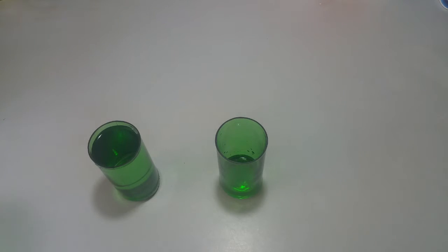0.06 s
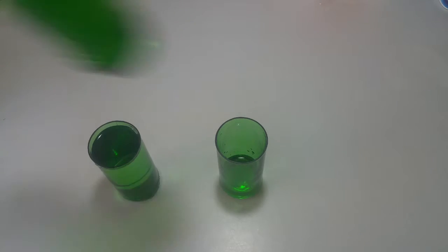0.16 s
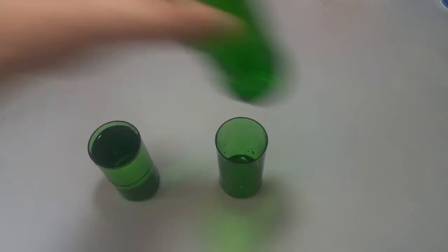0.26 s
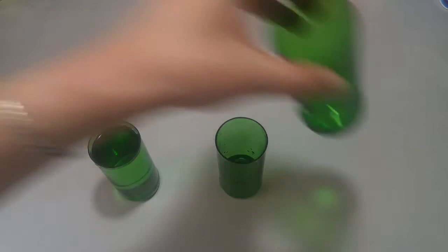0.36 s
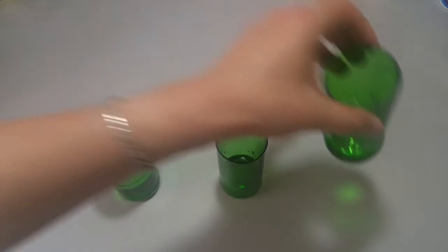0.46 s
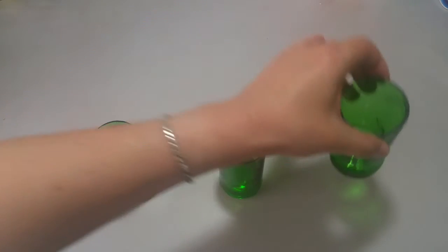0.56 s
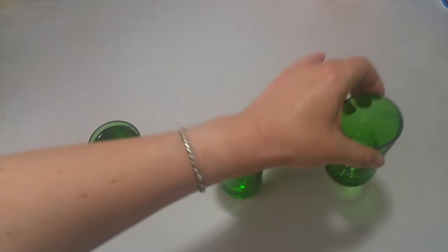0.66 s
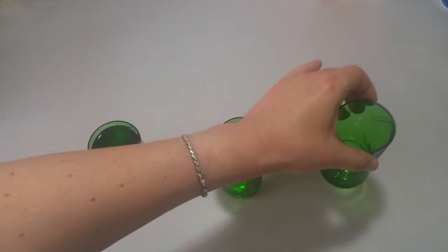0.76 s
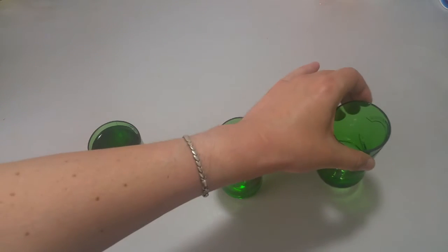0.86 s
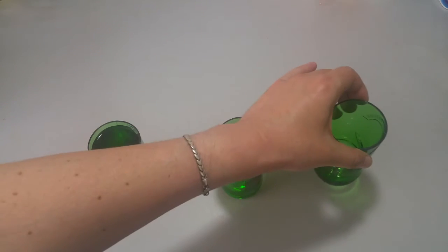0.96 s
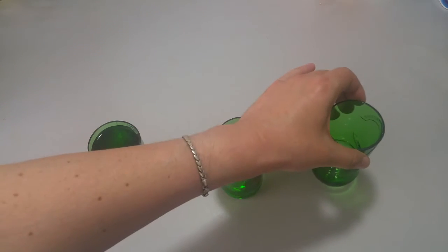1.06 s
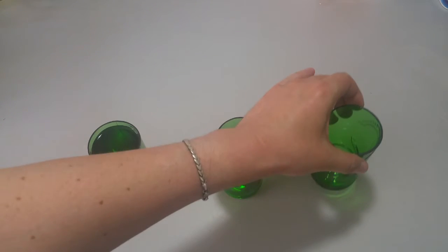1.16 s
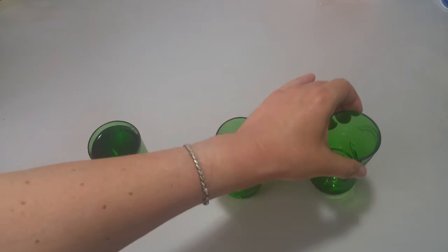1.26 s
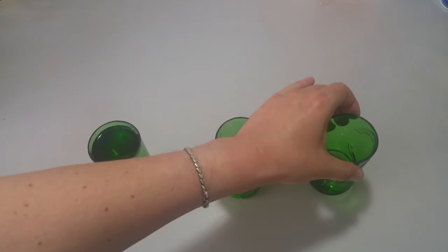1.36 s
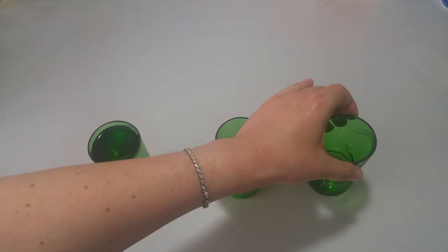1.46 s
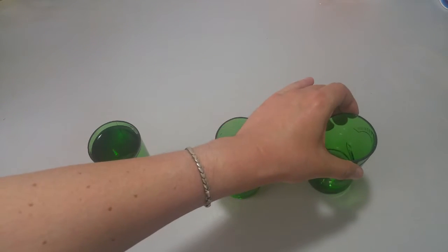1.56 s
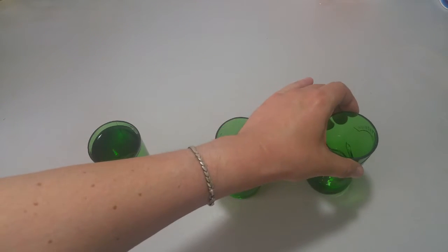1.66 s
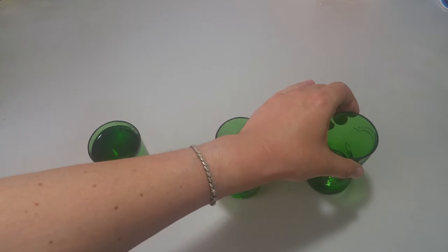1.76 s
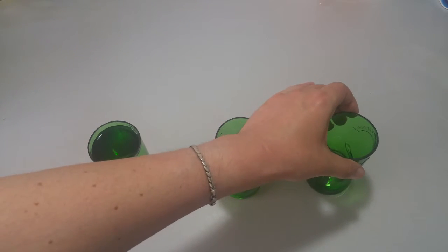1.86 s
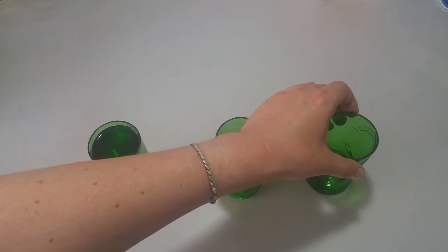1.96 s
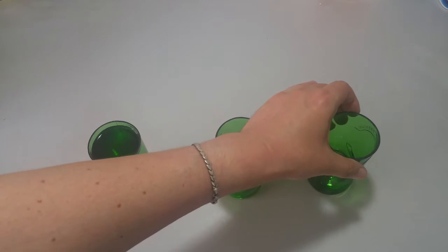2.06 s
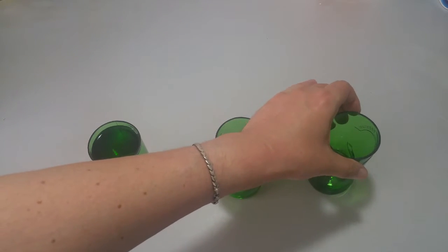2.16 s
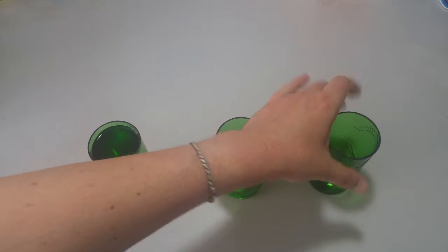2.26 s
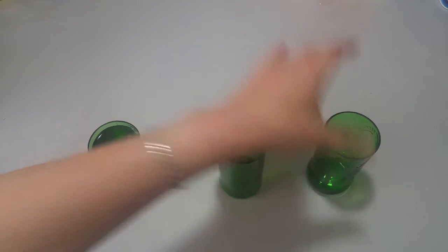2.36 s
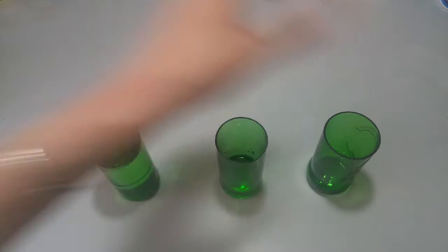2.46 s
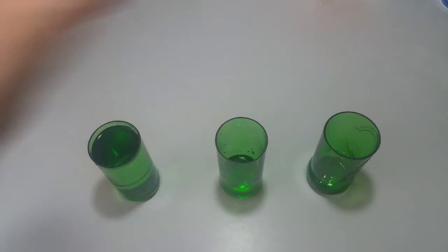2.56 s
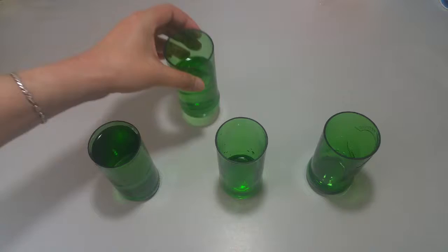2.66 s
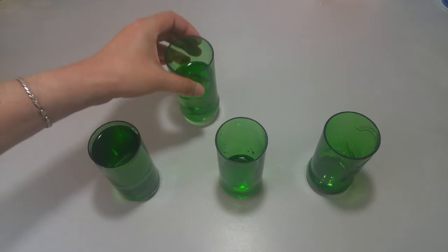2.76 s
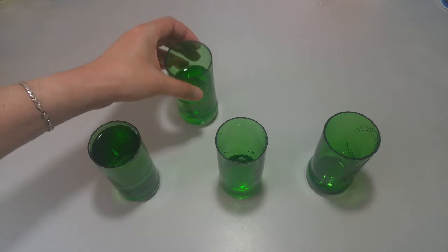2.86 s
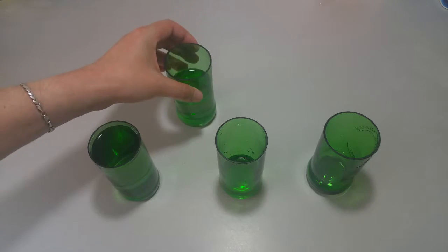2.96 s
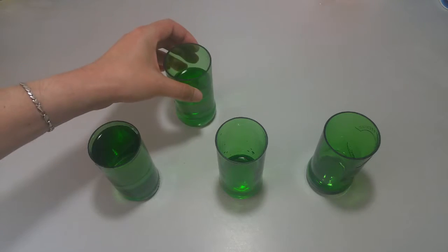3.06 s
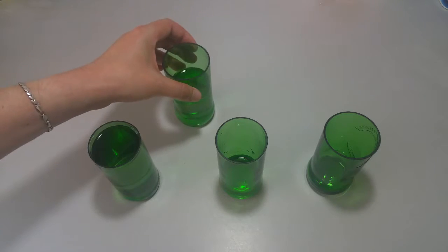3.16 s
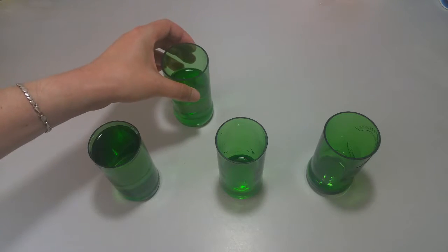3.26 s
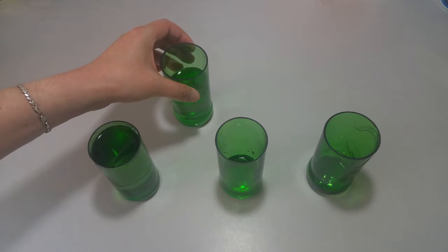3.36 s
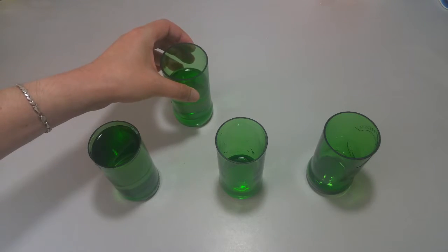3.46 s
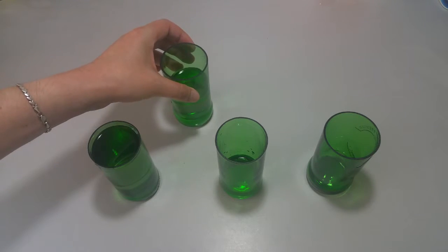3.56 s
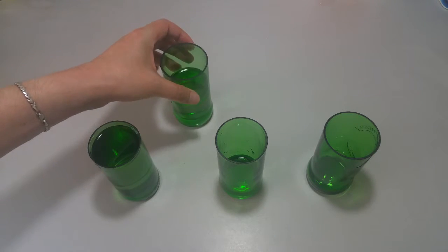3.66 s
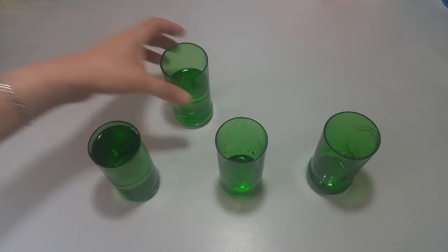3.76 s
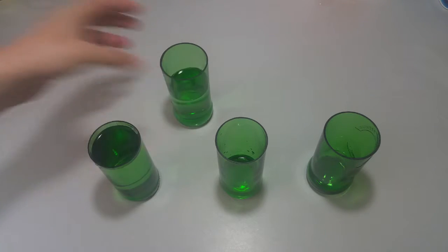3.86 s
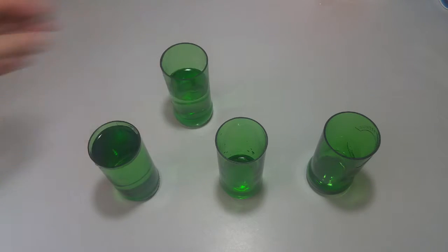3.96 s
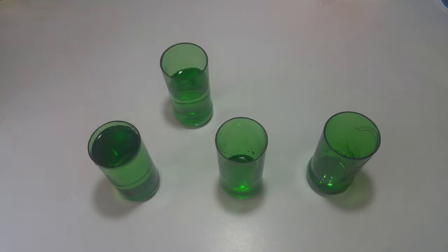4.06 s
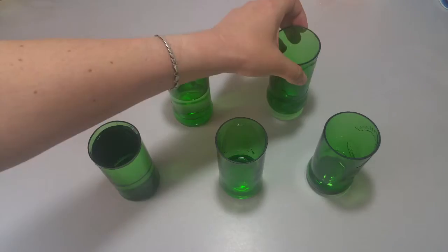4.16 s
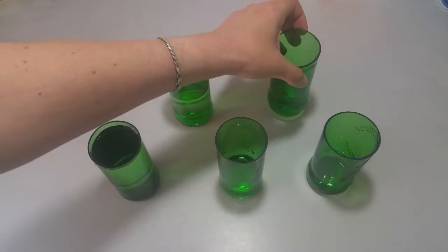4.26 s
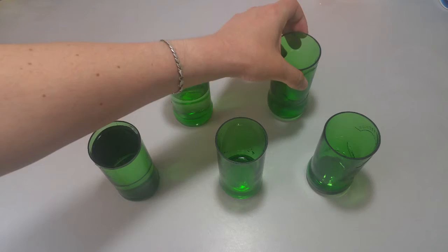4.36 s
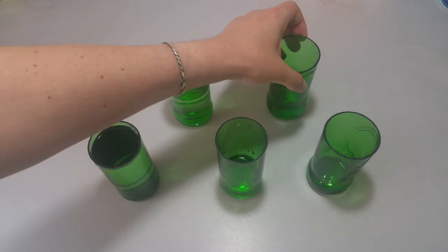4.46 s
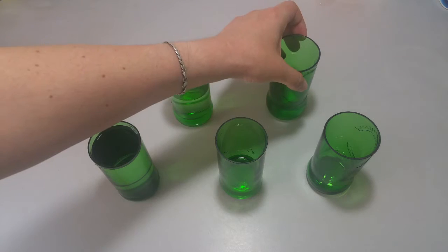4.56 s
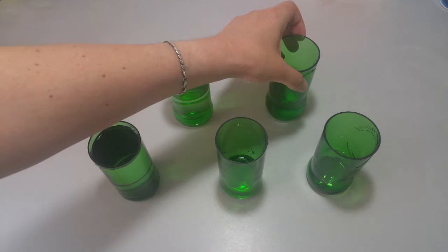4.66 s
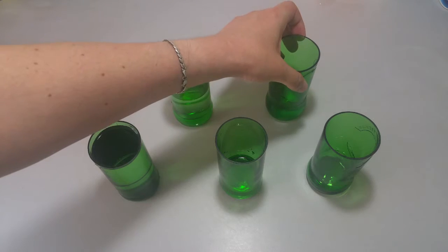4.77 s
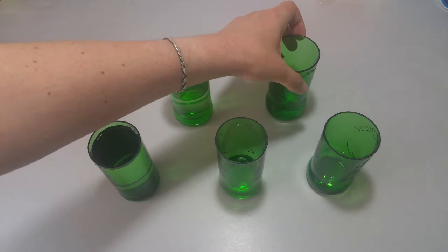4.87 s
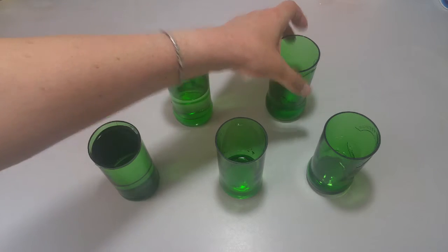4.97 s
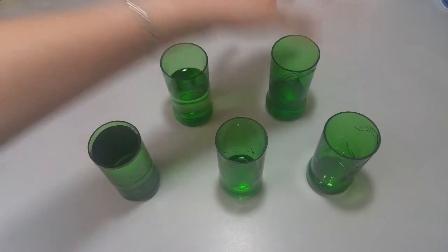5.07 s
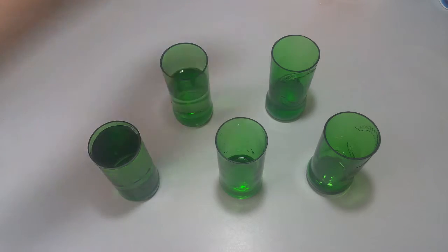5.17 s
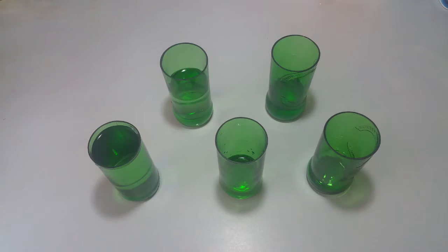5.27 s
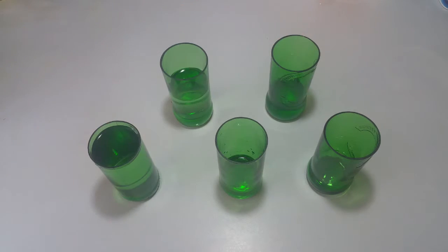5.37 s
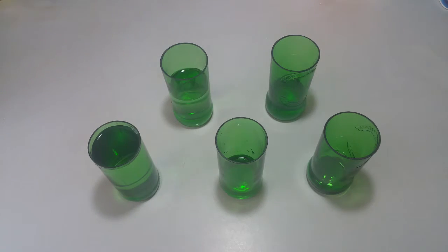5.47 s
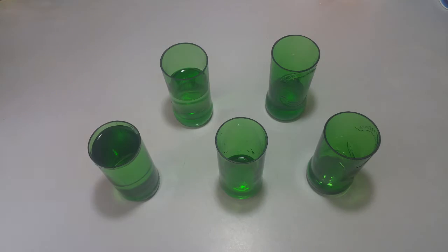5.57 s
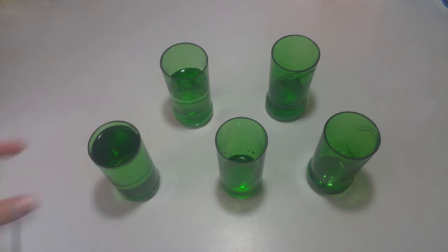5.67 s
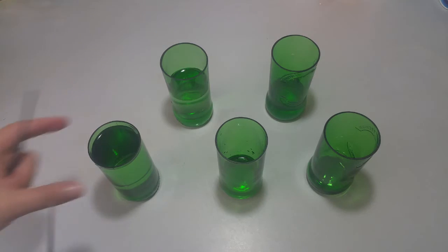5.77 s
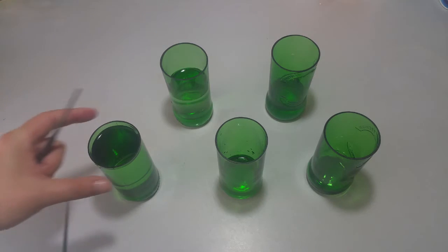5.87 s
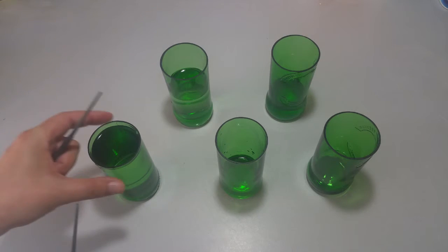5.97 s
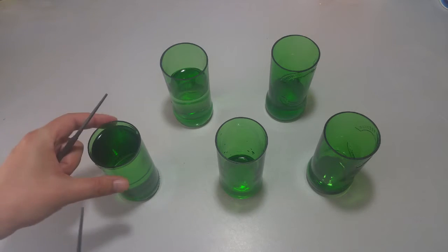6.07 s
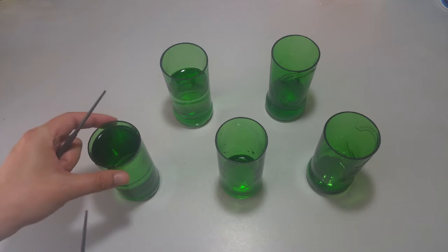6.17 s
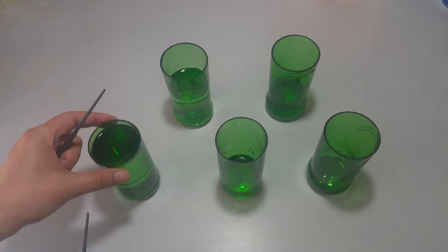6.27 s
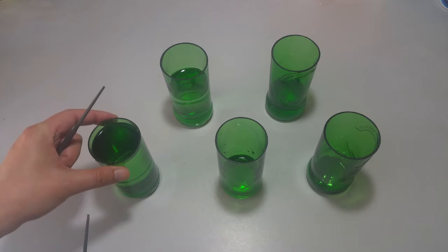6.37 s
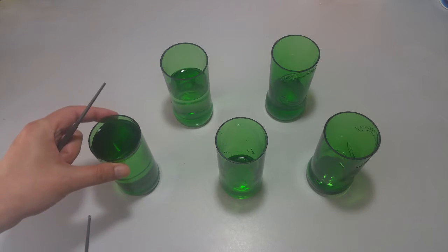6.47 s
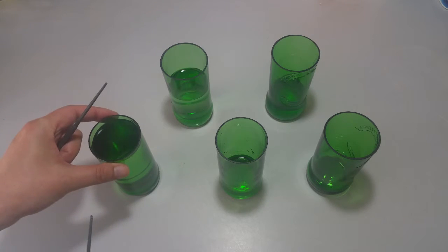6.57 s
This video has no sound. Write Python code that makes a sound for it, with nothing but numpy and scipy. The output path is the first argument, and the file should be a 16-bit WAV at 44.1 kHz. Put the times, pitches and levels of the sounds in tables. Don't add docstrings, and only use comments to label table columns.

```python
import sys
import numpy as np
from scipy import signal
from scipy.fft import rfft, irfft, next_fast_len
from scipy.io import wavfile
from scipy.ndimage import uniform_filter1d, map_coordinates

SR = 44100
rng = np.random.default_rng(int(sys.argv[2]) if len(sys.argv) > 2 else 0)


def voltage_ratio(decibels):
    exponent = np.asarray(decibels, float) / 20
    return 10 ** exponent


def materialize(psi):
    bounded = np.clip(np.atleast_2d(psi).T, -1, 1)
    quanta = np.round(bounded * 32767).astype(np.int16)
    wavfile.write(sys.argv[1], SR, quanta)


N = 292383

# time in seconds, peak in dB, table ring in dB, room in dB, clink in dB.
KNOCKS = [
    (1.5337, -18.5, -1, 10.5, -17.5),
    (1.7898, -23, -6, 10, -15),
    (2.122, -52.5, 9, 19.5, -8.5),
    (3.0069, -7.5, -3.5, 10, -17.5),
    (4.554, -5.5, -8, 8.5, -17),
    (6.27, -44, 1.5, 13.5, -40),
]
# delay in seconds, second contact in dB, first walls in dB,
# tail treble in dB, glass band of the tail in dB.
ROCKS = [(0.0028, -8, 0, -0.5, 3), (0.0036, -6, -2.5, 1, 1), (0.016, 7, -3, -6, -2),
         (0.001757, 2, -2.5, -4, 8), (0.0011, -3, -9, -0.5, 1.5), (0.0058, -10.5, 4, 0, 0)]
# frequency in Hz, level in dB per Hz.
THUDS = [
    [(24, -48.5), (128, -6.5), (329, -6.5), (800, -5), (1230, -22.5), (1420, -16), (2000, -24.5),
     (15000, -70)],
    [(24, -58), (160, -8), (244, -11), (514, -1), (1060, -6), (1820, -21.5), (4130, -45.5), (15000, -71.5)],
    [(120, -52), (200, -27), (290, -1), (385, -13), (519, -1), (1010, -14), (6000, -42), (13200, -120)],
    [(24, -55.5), (108, -5.5), (221, -8), (277, -1), (500, -6.5), (659, -1.5), (1960, -22.5), (15000, -71)],
    [(24, -55), (128, -7), (239, -14.5), (284, -9.5), (410, -9), (728, -2.5), (3000, -33), (15000, -70.5)],
    [(29, -46), (103, -16.5), (255, -10), (318, -2.5), (610, -21.5), (1020, -25.5), (3000, -54),
     (6600, -120)],
]
SHEEN_DB = [2.5, 2.5, 0.5, 8, 16, 0.5]
# frequency in Hz, level in dB, t60 in seconds.
FIRST_SPOTS = [
    [(127.8, -11, 0.65), (226, -10.5, 0.61), (261, -10, 0.54), (404, -26, 0.16), (495, -39, 0.81),
     (669, -13, 0.71), (759, -5.5, 0.33), (920, -4, 0.17), (976, -11.5, 0.47), (1067, -17.5, 0.42),
     (1425, -20, 0.1), (329.6, -11, 0.43)],
    [(320.1, -6, 0.35), (432, -5, 0.44), (496, 9.5, 0.092), (560, -22, 0.16), (752, -6.5, 0.47),
     (958, 0.5, 0.11), (1050, -5, 0.25), (1440, 9, 0.035), (1485, -16, 0.38), (1670, -15, 0.2),
     (1120, -6, 0.37), (725, -9.5, .4)],
    [(494, -2, 0.45), (756, -5, 0.46), (840, -23, 5.0), (1193, -21.5, 0.98)],
]
# frequency in Hz, level in dB, t60 in seconds.
LATER_SPOTS = [[(117.7, -12, 0.43), (187.2, -12.0, 0.45), (264.6, -12.5, 0.62), (423.7, -5.5, 0.45),
               (480, 2, 0.2), (669.5, -1.5, 0.38), (838.4, -7.0, 0.29), (890, -13, 0.49),
               (991, -10.5, 0.26), (1311, -15.0, 0.14)] + [(286.5, -4, .45), (2156, -25, 0.28),
               (79, -18, .4), (564, -8.5, .2)], [(131.3, -14.5, 0.61), (284.7, -3, 0.45), (340, -8.5, 0.54),
               (493.6, -11, .3), (443, -12, 0.5), (575, -15, 1.0), (669, -2.5, 0.28), (732, -7, 0.26),
               (737, -13.5, 0.2), (836, -13, 0.44), (877, -10, 0.27), (1333, -17, 0.3), (1690, -23, 0.44),
               (1863, -26, 0.54)], [(103, 0, 0.76), (178, -7, 0.79), (313.4, -2, 0.42), (514, -13.5, .7),
               (724, 0, 0.14)]]
# frequency in Hz, width in Hz, level in dB.
BASES = [
    [(2300, 124, 8.5), (2670, 77, -2), (3060, 155, -0.5), (3670, 120, -14), (4560, 280, -8),
     (6700, 98, -18)],
    [(2040, 30, -6), (2625, 64, -6), (3090, 250, 1.5), (3620, 150, -9), (4860, 110, -30)],
    [(1690, 28, -5), (2260, 36, -2), (2640, 47, -4), (3310, 45, -17)],
    [(1580, 86, 1), (2180, 25, -3.5), (3220, 180, -2.5), (3914, 210, -6.5), (4760, 260, -12),
     (6220, 120, -19.5), (7000, 320, -23)],
    [(2215, 240, 3.5), (2350, 69, -2), (2853, 470, 5), (3600, 230, -11), (4510, 290, -9.5),
     (6000, 206, -36.5), (6900, 252.4, -15.5), (7800, 360, -17.5)],
    [(1512, 19, 0), (2150, 52, -2)],
]
# frequency in Hz, width in Hz, depth in dB.
DIPS = [
    [(588, 57, 8), (1230, 70, 4.5), (1880, 120, 8.5)],
    [(250, 21, 9.5), (615, 45, 8.5), (833, 58, 8.5), (1250, 51, 10), (1790, 90, 11.5)],
    [(630, 45, 3), (1400, 100, 4)],
    [(351, 24.93, 5), (1204.5, 74, 4.5), (1930, 80, 7), (3450, 90, 5)],
    [(230, 8.5, 6), (622, 36, 8), (1000, 19, 3.5), (1536, 59, 9), (2000, 70, 8), (2300, 44, 6)],
    [(620, 60, 11), (1000, 80, 4)],
]
# frequency in Hz, left-right difference in dB.
TABLE_LEAN = [(250, -0.5), (600, -2), (1400, -1), (5000, -4), (12000, -2.5)]

# start, fastest and stop in seconds, level in dB, brightness in dB.
DRAGS = [(2.114, 2.143, 2.29, -46.5, -13.5), (2.677, 2.81, 2.95, -55, -26), (2.84, 2.931, 3.06, -57, -29.5),
         (3.26, 3.404, 3.5, -45, -17), (3.714, 3.794, 4.02, -55, -29.5), (6.269, 6.486, 6.61, -40.5, -15.5),
         (6.45, 6.504, 6.57, -38, -15)]
# frequency in Hz, level in dB per Hz.
SCRAPE = [(40, -40), (100, 2.5), (900, 3.5), (1400, -19.5), (2500, -39.5), (5000, -85.5)]
# frequency in Hz, level in dB per Hz.
SCRAPE_EDGE = [(700, -42), (1150, -5.5), (1550, -1.5), (2200, -4), (3100, -9.5), (4000, -13.5),
               (8000, -27.5), (15000, -27.5)]
# frequency in Hz, width in Hz, level in dB.
SCRAPE_TONES = [
    [(296, 26, 1), (518, 25, 3), (726, 25, 0.5), (1090, 23, -8)],
    [(312, 25, 1), (510, 35, 9.5), (694, 30, -0.5), (875.6, 30, -16)],
    [(320, 25, -3), (503, 27, 2), (909, 25, 0), (1055, 40, -9.5)],
    [(310, 62, 5), (470, 32, -6), (715, 30, -2.5), (940, 30, -11)],
    [(140, 50, 10), (185, 49, 6), (404, 29, 9), (494, 33, -11.5)],
    [(108, 6.2, 11), (325, 97, -2.5), (524, 14, -9), (798, 31, -2.5), (1150, 20, -5), (1340, 34, -23)],
    [(107, 13, 10), (380, 38, 0), (512, 32, 4), (790, 19, -6.5), (953, 22, -5), (1160, 30, 5),
     (1720, 40, 10)],
]

# time in seconds, level in dB, rise in seconds.
RELEASES = [(2.31, -74, 0.0099), (3.77, -78.5, 0.006), (4.955, -75, 0.0074)]
# frequency in Hz, level in dB, t60 in seconds, lag in seconds until the last finger lifts.
RIMS = [
    [(2412, 8, 0.15, .001), (2405, 5.5, .9, .001), (4810, 6, 0.23, .016), (4930, -1, .2, .03),
     (5770, 1, .2, .001), (10500, 0, 0.11, .001)],
    [(1680, 8, 0.18, .001), (1684, -0.5, 0.96, .001), (3610, 7, .08, .001), (5170, 5, 0.24, 0.02)],
    [(4370, 4, 0.23, .001), (4400, -12, .6, .001), (5700, -21, .15, .001)],
]
# time in seconds, peak in dB, left-right difference in dB.
TICKS = [(1.9145, -73, 0), (5.19, -55, 6), (5.204, -70, -2), (5.28, -74.5, 0), (5.479, -58.5, -1),
         (5.5, -72, 3)]
# frequency in Hz, level in dB per Hz.
ROD = [(250, -25), (600, -2), (1300, -11.5), (2000, -2.5), (2700, -7), (3500, -2), (5500, -15),
       (16000, -30.5)]
# start, fastest and stop in seconds, level in dB.
SLEEVE = [(.1, .3, 1.1, -79), (.47, .54, 0.62, -83), (.8, 1.05, 1.3, -91), (2.2, 2.44, 2.72, -74),
          (3.5, 3.75, 4.3, -82), (3.85, 4.05, 4.2, -81.5), (5.0, 5.3, 5.88, -80), (6.0, 6.1, 6.27, -83)]
# frequency in Hz, level in dB per Hz.
CLOTH = [(1200, -25.5), (2500, -6), (3600, 0), (5000, -7.5), (7000, -11.5), (10000, -30.5)]
# start, heaviest and end in seconds, level in dB.
SHUFFLE = [(.45, .74, 1.5, -74.5), (1.5, 1.7, 2.21, -58), (2.26, 2.38, 2.62, -61), (3.0, 3.15, 3.69, -50),
           (3.5, 3.82, 4.17, -64.5), (4.5, 4.68, 5.34, -50), (5.1, 5.25, 5.65, -61),
           (6.0, 6.35, 10.4, -62.5)]
# frequency in Hz, level in dB per Hz.
BOARDS = [(30, -41.5), (55, -6.5), (110, -2.5), (170, -9), (300, -12), (500, -17.5), (900, -47)]
# time in seconds, length in seconds, first and last pitch in Hz, level in dB.
FAR_CALLS = [(0.767, .02, 7200, 7000, -73), (0.21, 0.14, 3860, 2860, -74), (0.858, 0.19, 3800, 3650, -73),
             (1.214, .06, 3800, 2950, -66), (1.274, 0.098, 3140, 3090, -73),
             (3.62, 0.086, 3720, 3180, -74.5), (3.74, 0.052, 3600, 3620, -71),
             (3.991, 0.058, 3485, 3406, -72), (5.622, 0.064, 3420, 3170, -72.5),
             (6.12, 0.079, 3670, 3190, -71)]
# time in seconds, length in seconds, edge and top pitch in Hz, level in dB.
ARCHES = [(0.616, .17, 7400, 8100, -78), (0.63, 0.19, 7400, 7720, -89)]

# frequency in Hz, t60 in seconds.
ROOM = [(60, 0.74), (150, 0.45), (400, 0.57), (1000, 0.6), (3000, 0.6), (6000, 0.52), (12000, 0.36)]
# delay in seconds, left level in dB, right level in dB.
WALLS = [(.0032, -7.5, -8.5), (.0052, -0.5, -1.5), (.0095, -1.5, 2.5), (0.0143, -11, -9)]
# frequency in Hz, left-right likeness from -1 to 1.
ROOM_ALIKE = [(60, 0.94), (180, 0.97), (550, 0.55), (1650, -0.34), (4970, 0.12), (15000, -0.11)]
# frequency in Hz, left-right likeness from -1 to 1.
AIR_ALIKE = [(60, 0.66), (240, 0.43), (950, 0.023), (3770, 0.027), (15000, 0.05)]
# frequency in Hz, level in dB per Hz.
AIR = [(25, -23), (55, -14.5), (250, -14), (700, -19.5), (1200, -24), (3600, -28.5), (6500, -37),
       (15700, -42)]
# frequency in Hz, left-right difference in dB.
AIR_LEAN = [(60, 3.5), (180, -10.5), (550, 0), (1650, -1.0), (4970, -3), (15000, 6.5)]
# frequency in Hz, width in Hz, level in dB.
HUM = [(54, 8.7, -82.5), (113, 23, -76.5), (209.4, 5.5, -71.5), (287.8, 17, -80.5), (340, 3.8, -82),
       (442, 30, -82)]
# frequency in Hz, level in dB per Hz.
SIZZLE = [(6000, -42.5), (8500, -14.5), (10500, -1), (12000, 3.5), (14000, -5.5), (15700, -8.5)]
FIRST_POLLS = [.09, .899, 2.782, 4.291, 5.615]
# time in seconds, half length in seconds.
CUTS = [(0.795, 0.012), (2.697, 0.01), (4.197, 0.01), (5.566, 0.011)]

TAIL = 30000
SHEEN_HZ, TREBLE_HZ = 9600, 1320
GLASS_LOW_HZ, GLASS_HIGH_HZ = 2280, 8000
TABLE_BANDS_DB, TABLE_BAND_HZ = 4, 41
SLOWING_DULLS_DB = 11.5
GET_GOING = 0.61
REST_DB, GOING_DB, EASING_DB = -24, -8, -8
GLIDE_LATE, CALL_FADE_DB = 1.2, 5
AIR_DB = -65
BLADE_HZ, BLADE_DB = 216, -70
POLL_S, POLL_DB, POLL_WIDTH_S = .1007, 6.5, .0035
OFFSET, TOP_HZ = -.0006, 15710


def along(points, hz):
    f, v = np.transpose(points)
    return np.interp(np.log(hz + 1), np.log(f + 1), v)


def unit(x):
    return x / np.sqrt(np.mean(x ** 2) + 1e-20)


def wobble(rate):
    knots = rng.standard_normal(int(N * rate / SR) + 4)
    return map_coordinates(knots, [np.arange(N) * rate / SR])


def filtered(x, response):
    m = next_fast_len(x.shape[-1] + 8192)
    return irfft(rfft(x, m) * response(np.fft.rfftfreq(m, 1 / SR)), m)[..., :x.shape[-1]]


def noise(spectrum, x):
    return unit(filtered(x, lambda f: voltage_ratio(along(spectrum, f))))


def resonance(f, hz, width):
    return 1 / (1 + ((f - hz) / width) ** 2)


def leaning(x, lean):
    return filtered(x, lambda f: voltage_ratio(np.outer([.5, -.5], along(lean, f))))


def paired(pair, alike):
    turn = lambda hz: np.arccos(np.clip(along(alike, hz), -1, 1)) / 2
    split = lambda hz: np.sqrt(2) * np.array([np.cos(turn(hz)), np.sin(turn(hz))])
    mid, side = filtered(pair, split)
    return np.array([mid + side, mid - side]) / np.sqrt(2)


def pulse(spectrum, size=4096):
    magnitude = voltage_ratio(along(spectrum, np.fft.rfftfreq(size, 1 / SR)))
    cepstrum = irfft(np.log(magnitude + 1e-6), size)
    cepstrum[1:size // 2] *= 2
    cepstrum[size // 2 + 1:] = 0
    p = irfft(np.exp(rfft(cepstrum)), size)
    return p / np.abs(p).max()


def add(out, x, s):
    i = round(s * SR)
    out[:, i:i + x.shape[1]] += x[:, :N - i]


def sides(pan_db):
    return voltage_ratio([[pan_db / 2], [-pan_db / 2]])


def echo(x, build_s=0.0015):
    hz, t, z = signal.stft(rng.standard_normal((2, TAIL)), SR, nperseg=256)
    decay = voltage_ratio(-60 * t / along(ROOM, hz)[:, None])
    tail = signal.istft(z * decay, SR, nperseg=256)[1][:, :TAIL]
    tail = paired(tail, ROOM_ALIKE) * (1 - np.exp(-np.arange(TAIL) / SR / build_s))
    return signal.oaconvolve(np.atleast_2d(x), tail / np.linalg.norm(tail[0]), axes=1)


def movement(t, start, peak, stop):
    times = [start, start + GET_GOING * (peak - start), peak, (peak + stop) / 2, stop]
    return np.interp(t, times, [REST_DB, GOING_DB, 0, EASING_DB, REST_DB], -120, -120)


def movements(rows):
    t = np.arange(N) / SR
    return sum(voltage_ratio(db + movement(t, *times)) for *times, db in rows)


def table_ring(spot):
    t, ring = np.arange(TAIL) / SR, np.zeros((2, TAIL))
    for hz, level_db, t60 in spot:
        spread = np.arccos(np.clip(along(ROOM_ALIKE, hz), -1, 1))
        skew = spread * rng.uniform(-0.16, 1) * np.array([[.5], [-.5]])
        wave = np.sin(2 * np.pi * (hz * t + rng.random()) + skew)
        ring += voltage_ratio(level_db - 60 * t / min(t60, .7)) * wave
    return ring * (1 - np.exp(-t / 0.0075))


def base_clink(base, clink_db):
    t, clink = np.arange(TAIL) / SR, np.zeros((2, TAIL))
    for hz, width, level_db in base:
        decay = np.exp(-np.pi * np.clip(width, 40, 300) * t)
        wave = np.sin(2 * np.pi * (hz * t + rng.random((2, 1)) / 4))
        clink += voltage_ratio(clink_db + level_db) * decay * wave
    return clink * (1 - np.exp(-t / .001))


def tail_colour(f, spot, base, dips, treble_db, glass_db):
    glass_modes = sum(7 / (1 + ((f - hz) / 130) ** 2) for hz, _, _ in base) - 5.9 * (f > 1900)
    treble = treble_db / (1 + (TREBLE_HZ / (f + 1)) ** 4)
    nearest = np.max([resonance(f, hz, TABLE_BAND_HZ) for hz, _, _ in spot], axis=0)
    table_modes = TABLE_BANDS_DB * (nearest - .5 * (f < TREBLE_HZ))
    weak = sum(depth_db * resonance(f, hz, width) for hz, width, depth_db in dips)
    glass_band = glass_db / (1 + (GLASS_LOW_HZ / (f + 1)) ** 8) / (1 + (f / GLASS_HIGH_HZ) ** 8)
    return voltage_ratio(glass_modes + treble + table_modes - weak + glass_band)


def knocks():
    out = np.zeros((2, N))
    contact = np.hanning(round(0.0005 * SR) + 3)
    contact /= contact.sum()
    crunch_t = np.arange(400) / SR
    spots = FIRST_SPOTS + LATER_SPOTS
    for knock, rock, thud, spot, base, dips, sheen_db in zip(KNOCKS, ROCKS, THUDS, spots, BASES, DIPS, SHEEN_DB):
        s, db, ring_db, room_db, clink_db = knock
        rock_s, rock_db, walls_db, treble_db, glass_db = rock
        gain = voltage_ratio(db) * np.ones((2, 1))
        blow = -filtered(pulse(thud), lambda f: voltage_ratio(sheen_db / (1 + (SHEEN_HZ / (f + 1)) ** 8)))
        direct = gain * (np.convolve(blow, contact)[:len(blow)] + 0.044 * blow)
        ring = voltage_ratio(ring_db - 2.0) * table_ring(spot)
        clink = base_clink(base, clink_db)
        grit = rng.standard_normal((2, 400)) * voltage_ratio(clink_db + 9.5 - 60 * crunch_t / 0.0022)
        sharp_blow = np.convolve(np.diff(blow), np.hanning(7))[None] / 3
        crack = signal.fftconvolve(grit, sharp_blow, axes=1)
        coloured = filtered(blow, lambda f: tail_colour(f, spot, base, dips, treble_db, glass_db))
        add(out, direct, s)
        add(out, voltage_ratio(rock_db) * (direct + gain * clink[:, :len(blow)]), s + rock_s)
        add(out, gain * crack, s + 0.00063)
        for delay, left_db, right_db in WALLS:
            add(out, direct * voltage_ratio([[left_db + walls_db], [right_db + walls_db]]), s + delay)
        add(out, gain * (ring + clink), s)
        add(out, gain * voltage_ratio(room_db) * echo(coloured + voltage_ratio(-18.5) * clink[0, :len(blow)]), s)
    return out


def drags():
    out = np.zeros((2, N))
    for (start, peak, stop, level_db, bright_db), tones in zip(DRAGS, SCRAPE_TONES):
        t = np.arange(start, stop, 1 / SR)
        slips = rng.random(len(t)) < .25
        grains = rng.standard_normal(len(t)) * voltage_ratio(1.5 * wobble(60)[:len(t)]) * slips
        modes = lambda f: 0.33 + sum(voltage_ratio(db) * resonance(f, hz, w) for hz, w, db in tones)
        body = unit(filtered(grains, lambda f: modes(f) * voltage_ratio(along(SCRAPE, f))))
        edge = noise(SCRAPE_EDGE, grains)
        edge_gain = voltage_ratio(bright_db - np.interp(t, [peak, stop], [0, SLOWING_DULLS_DB]))
        slide = voltage_ratio(level_db + movement(t, start, peak, stop)) * (body + edge_gain * edge)
        add(out, voltage_ratio(-5.5) * slide[None], start)
        add(out, voltage_ratio(-4.5) * echo(slide), start)
    return out


def rims():
    out, t = np.zeros((2, N)), np.arange(SR // 2) / SR
    for (s, db, rise), modes in zip(RELEASES, RIMS):
        ring = np.zeros(len(t))
        for hz, mode_db, t60, lag in modes:
            onset = 1 - np.exp(-np.clip(t - lag, 0, 1) / rise)
            ring += voltage_ratio(db + mode_db - 60 * t / t60) * onset * np.sin(2 * np.pi * hz * t)
        add(out, ring * sides(-19.0), s)
        add(out, voltage_ratio(-12.0) * echo(ring), s)
    return out


def rod():
    out = np.zeros((2, N))
    for s, db, pan_db in TICKS:
        tick = voltage_ratio(db) * pulse(ROD)
        add(out, tick * sides(pan_db) * voltage_ratio(11.0), s)
        add(out, voltage_ratio(24.5) * echo(tick), s)
    return out * (np.arange(N) < CUTS[-1][0] * SR)


def sleeve():
    fibres = rng.standard_normal((2, N)) * voltage_ratio(2.2 * wobble(45))
    return voltage_ratio(7.5) * movements(SLEEVE) * noise(CLOTH, fibres)


def shuffle():
    low = noise(BOARDS, rng.standard_normal((2, N)) * voltage_ratio(3.1 * wobble(24)))
    return movements(SHUFFLE) * paired(low, ROOM_ALIKE)


def whistle():
    calls = np.zeros((1, N))
    for s, length, edge_hz, top_hz, db in ARCHES:
        arch = np.sin(np.pi * np.arange(0, 1, 1 / SR / length))
        pitch = edge_hz + (top_hz - edge_hz) * arch
        add(calls, voltage_ratio(db) * arch[None] ** 0.21 * np.sin(2 * np.pi * np.cumsum(pitch) / SR), s)
    return calls + voltage_ratio(-6) * echo(calls)[:, :N]


def birds():
    calls = np.zeros((1, N))
    for s, length, first_hz, last_hz, db in FAR_CALLS:
        t = np.arange(0, 1, 1 / SR / length)
        flutter = uniform_filter1d(rng.standard_normal((2, len(t))), size=200)
        pitch = first_hz + (last_hz - first_hz) * t ** GLIDE_LATE + 2600 * flutter[0]
        swell = voltage_ratio(db - CALL_FADE_DB * t + 33 * flutter[1]) * np.hanning(len(t)) ** 0.1
        add(calls, (swell * np.sin(2 * np.pi * np.cumsum(pitch) / SR))[None], s)
    return voltage_ratio(-2.5) * calls * sides(-2.4) + voltage_ratio(-0.5) * echo(calls)[:, :N]


def polling():
    t = np.arange(N) / SR
    first = np.array(FIRST_POLLS)[np.searchsorted([s for s, _ in CUTS], t)]
    away = (t - first + POLL_S / 2) % POLL_S - POLL_S / 2
    return POLL_DB * np.exp(-.5 * (away / POLL_WIDTH_S) ** 2)


def air():
    hiss = voltage_ratio(AIR_DB) * noise(AIR, rng.standard_normal((2, N)))
    comb = lambda f: sum(voltage_ratio(db) * np.sqrt(SR / w) * resonance(f, hz, w) for hz, w, db in HUM)
    fan = voltage_ratio(-1.0) * filtered(rng.standard_normal((2, N)), comb)
    flicker = voltage_ratio(-79.5 + 2.4 * wobble(105) + polling())
    sizzle = flicker * noise(SIZZLE, rng.standard_normal((2, N)))
    blade = voltage_ratio(BLADE_DB) * np.sin(2 * np.pi * BLADE_HZ * np.arange(N) / SR)
    swell = voltage_ratio(0.94 * wobble(3.1))
    return swell * leaning(paired(hiss + fan, AIR_ALIKE) + sizzle + blade, AIR_LEAN)


def scene():
    table = leaning(knocks(), TABLE_LEAN)
    handling = drags() + rims() + rod() + sleeve() + shuffle()
    return table + handling + whistle() + birds() + air()


def top_cut(x):
    return signal.sosfilt(signal.butter(12, 15700, fs=SR, output="sos"), x)


def record(dry):
    t = np.arange(N) / SR
    fade = np.prod([np.clip(np.abs(t - s) / half, 0, 1) for s, half in CUTS], axis=0)
    mix = filtered(dry * fade, lambda f: f < TOP_HZ) + OFFSET
    return top_cut(mix)


dry = scene()
out = record(dry)
materialize(out)
```